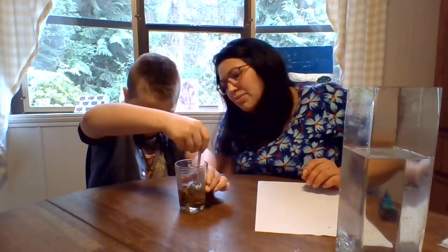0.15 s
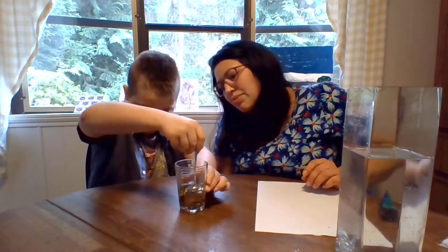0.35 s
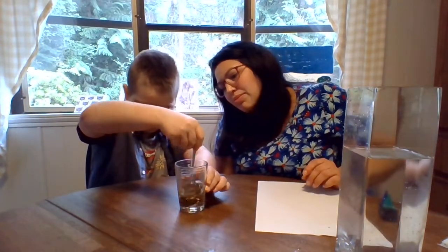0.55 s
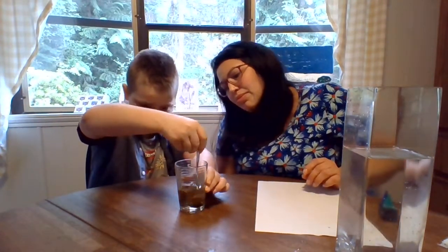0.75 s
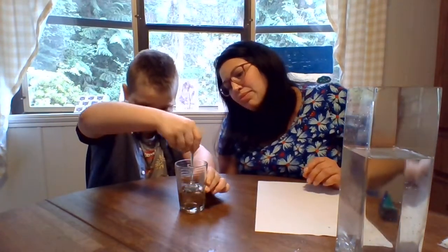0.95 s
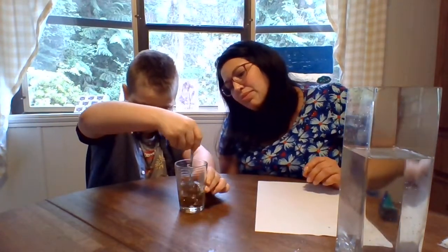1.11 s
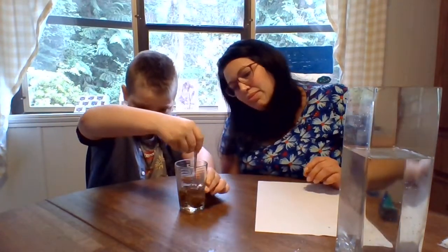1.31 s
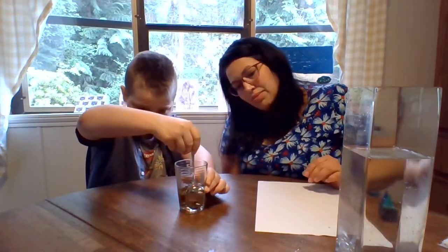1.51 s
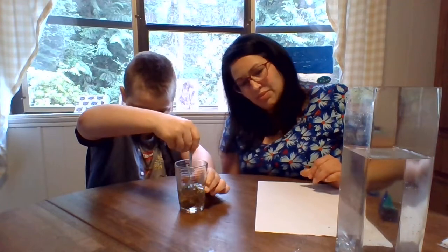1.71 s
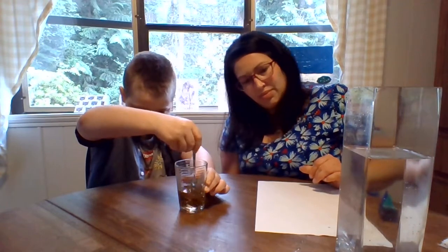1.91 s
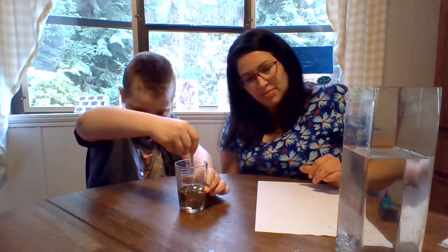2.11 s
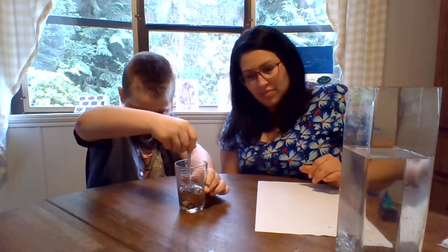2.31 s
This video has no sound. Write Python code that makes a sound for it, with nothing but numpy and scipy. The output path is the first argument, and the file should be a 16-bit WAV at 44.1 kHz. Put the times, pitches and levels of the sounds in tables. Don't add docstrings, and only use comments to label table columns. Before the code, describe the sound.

A metal spoon stirs a small glass on a wooden table; four sharp ringing clinks come unevenly, with dull thumps and rattles of the glass foot, in a small room through a hissy laptop microphone.

```python
import sys
import numpy as np
from scipy import signal
from scipy.fft import rfft, irfft
from scipy.io import wavfile

SR = 44100
rng = np.random.default_rng(int(sys.argv[2]) if len(sys.argv) > 2 else 0)


def nominal_scale(level):
    x = np.asarray(level, float) / 20
    return 10 ** x


def put_to_file(sound):
    columns = np.atleast_2d(sound).T
    safe = np.clip(columns, -1, 1)
    whole_steps = np.round(safe * 32767)
    wavfile.write(sys.argv[1], SR, whole_steps.astype(np.int16))


N = 103635
TIME_S = np.arange(N) / SR

# f/Hz, level/dB
WHINE_TONES = [(1001, -76), (1529, -79), (2003, -77), (4011, -78), (5012, -77), (5809, -85), (6013, -83),
               (7014, -90), (8000, -83), (8667, -83), (8699, -75), (10024, -82), (11025, -76), (11590, -92)]
# f/Hz, density/dB per Hz
HISS_COLOUR = [(880, -21), (1500, 5.5), (2470, 1.5), (2700, -9.5), (3880, -1.5), (4370, -4), (4940, -6),
               (8880, -2), (11800, 2.5), (15300, -73), (22000, -120)]
# f/Hz, density/dB per Hz
AIR_COLOUR = [(60, -36), (90, 14), (130, -10.5), (400, 6), (800, -8), (1200, -12), (1700, -10),
              (2300, -54.5)]
# t/s, length/s, loss/dB
TREBLE_DROPS = [(.445, .018, -12), (1.30, .018, -14), (1.47, .018, -10), (1.60, .018, -10),
                (1.958, .015, -22)]
# t/s, level/dB
DRAG_PRESSURE = [(0, -47), (.15, -50.5), (.3, -28.5), (0.442, -50.5), (0.498, -32), (0.568, -71),
                 (.7, -39.5), (1.0, -44.5), (1.07, -43), (1.135, -54.5), (1.2, -46), (1.33, -37.5),
                 (1.48, -49), (1.56, -42.5), (1.85, -43), (1.97, -41), (2.22, -39.5), (2.35, -64)]
# f/Hz, density/dB per Hz
RUMBLE_COLOUR = [(50, -44.5), (100, -5), (140, 1), (300, -6), (400, -28.5), (550, -48), (900, -22),
                 (1500, -36)]
# start t/s, length/s, level/dB, f/Hz
TIP_RUBS = [(-0.01, 0.22, -49, 826), (0.643, 0.068, -44.5, 890), (1.124, 0.14, -46, 844),
            (1.4, 0.24, -53, 775), (1.83, 0.089, -55.5, 820), (1.905, 0.1, -43, 845),
            (2.108, 0.24, -52, 780)]
# start t/s, length/s, level/dB, f/Hz
SINGING_NOTES = [
    (1.932, 0.057, -29.5, 840),
    (1.975, 0.042, -32.5, 827),
]
# t/s, level/dB, rattle length/s, contact hardness f/Hz
FOOT_THUMPS = [(0.0, -33, 0.019, 600), (0.12, -35, 0.022, 1500), (0.202, -21, 0.1, 1230),
               (0.2663, -10, 0.017, 1170), (0.61, -15, 0.025, 740), (.67, -52, 0.018, 1500),
               (.775, -24, 0.048, 1510), (0.807, -29, 0.017, 600), (0.844, -8.5, 0.021, 1150),
               (1.343, -29.5, 0.034, 1480), (1.362, -16, 0.032, 1000), (1.859, -37, 0.032, 810),
               (2.017, -18, 0.025, 810), (2.045, -14, 0.014, 1000), (2.189, -39, 0.025, 810)]
# f/Hz, level/dB, t60/s
TABLE_MODES = [(146, -7, 0.05), (172, -5, 0.068), (245.6, -1.5, 0.093), (301.2, -1, 0.095),
               (369, -0.5, 0.069), (415.6, 0.5, 0.064), (529.6, -6, 0.08), (600, -8, 0.052),
               (835, -3, 0.033), (1000, -4.5, 0.02), (1286, -5.5, 0.023), (1610, -9, 0.032),
               (1820, -9, 0.026)]
# t/s, level/dB, f/Hz
SPOON_TOUCHES = [(0.218, -37, 4210), (0.23, -35.5, 3910), (.2665, -27.5, 3460), (0.608, -51, 3780),
                 (0.8446, -32.5, 3430), (1.377, -35.5, 3280), (2.045, -34, 3780)]
# t/s, crack level/dB, low mode
# level/dB, middle mode level/dB, high mode level/dB
SPOON_CLINKS = [(0.0, -38.5, -61, -83, -63), (0.1986, -14, -29.5, -28.5, -25.5),
                (0.268, -70, -41, -73, -55), (.609, -42.5, -64, -89, -58), (.7736, -12.5, -33, -39.5, -24),
                (0.851, -72, -41, -41.5, -40.5), (1.207, -60, -68, -83, -67),
                (1.3416, -15, -39.5, -39, -24), (1.41, -70, -38.5, -68, -41),
                (2.0094, -12, -35.5, -31.5, -25.5), (2.06, -70, -38.5, -70, -56)]
# f/Hz, density/dB per Hz
CRACK_COLOUR = [(300, -3.5), (1000, 2.5), (2000, -2), (4000, -5), (6000, -5), (9000, -2), (11000, -6),
                (13000, 6.5)]
# f/Hz, level/dB, t60/s
LOW_GLASS = [(2751, 0, .15), (2722, -4, .1), (2803, -6, .08), (2570, -4, .06), (3800, -12, .04),
             (2400, -8, .04)]
MIDDLE_GLASS = [(6342, 0, .21), (5500, -5, .08), (6040, -11, .07)]
HIGH_GLASS = [(8168, -4, .2), (8207, 0, .22), (8236, -4, .17), (8291, -6, .1), (8200, 7, .025),
              (11400, -11, .05), (4850, 3, .02)]
GLASS_SWELL_S = (.04, .006, .005)


def rms_one(x):
    return x / np.sqrt(np.mean(x ** 2) + 1e-20)


def shaped(x, points):
    hz = np.fft.rfftfreq(len(x), 1 / SR) + 1
    f, db = np.transpose(points)
    octaves_out = np.maximum(np.log2(f[0] / hz), 0) + np.maximum(np.log2(hz / f[-1]), 0)
    gain_db = np.interp(np.log(hz), np.log(f), db) - 22 * octaves_out
    return rms_one(irfft(rfft(x) * nominal_scale(gain_db), len(x)))


def drift(rate_hz):
    r = np.exp(-2 * np.pi * rate_hz / SR)
    wander = signal.lfilter([1], [1, -2 * r, r * r], rng.standard_normal(N + SR))
    return rms_one(wander[SR:])


def ring(clicks, hz, t60):
    r, w = nominal_scale(-60 / (t60 * SR)), 2 * np.pi * hz / SR
    return signal.lfilter([0, np.sin(w)], [1, -2 * r * np.cos(w), r * r], clicks + 1e-18)


def hump(start, length):
    return np.sin(np.pi * np.clip((TIME_S - start) / length, 0, 1)) ** 2


def clicks_at(times, levels_db):
    clicks = np.zeros(N)
    clicks[(np.asarray(times) * SR).astype(int)] = nominal_scale(levels_db)
    return clicks


def butter(order, hz, kind="low"):
    return signal.butter(order, hz, kind, fs=SR, output="sos")


def whine():
    out = np.zeros(N)
    for hz, db in WHINE_TONES:
        out += np.sqrt(2) * nominal_scale(db + 1.5) * np.sin(2 * np.pi * (hz * TIME_S + rng.random()))
    return out


def hiss():
    return nominal_scale(-64.5 + 0.4 * drift(3.2)) * shaped(rng.standard_normal(N), HISS_COLOUR)


def air():
    return nominal_scale(-57.5 + 0.61 * drift(1)) * shaped(rng.standard_normal(N), AIR_COLOUR)


def rumble():
    t, db = np.transpose(DRAG_PRESSURE)
    lumpy = rng.standard_normal(N) * nominal_scale(2.5 * drift(14))
    return nominal_scale(np.interp(TIME_S, t, db) - 2.5) * shaped(lumpy, RUMBLE_COLOUR)


def rubs():
    width_hz, wide_db = 65, -12
    out, noise = np.zeros(N), rng.standard_normal(N)

    def resonance(hz, width):
        t60 = 0.92 / width
        return rms_one(ring(ring(noise, hz, t60), hz, t60))

    for start, length, db, hz in TIP_RUBS:
        swell = hump(start, length)
        narrow, wide = resonance(hz, width_hz), resonance(hz, 8 * width_hz)
        narrow = narrow / np.sqrt(np.sum(swell * narrow ** 2) / np.sum(swell))
        out += nominal_scale(db) * swell * (narrow + nominal_scale(wide_db) * wide)
    return out


def sings():
    out = np.zeros(N)
    for start, length, db, hz in SINGING_NOTES:
        out += nominal_scale(db) * hump(start, length) * np.sin(2 * np.pi * hz * TIME_S)
    return out


def thumps():
    contacts_per_s, contact_db, thump_db = 790, -6, -9.5
    force = np.zeros(N)
    rattle = (rng.random(N) < contacts_per_s / SR) * rng.normal(0, nominal_scale(contact_db), N)
    for t, db, length, hardness_hz in FOOT_THUMPS:
        fade = np.exp(-(np.maximum(TIME_S - t, 0) / max(length, .003)) ** 2)
        blow = rattle * (TIME_S > t) * fade
        blow[int(t * SR)] += 1
        force += nominal_scale(db) * signal.sosfilt(butter(2, hardness_hz), blow + 1e-18)
    out = np.zeros(N)
    for k, (hz, db, t60) in enumerate(TABLE_MODES):
        out += nominal_scale(db) * (-1) ** k * ring(force, hz, t60)
    return nominal_scale(thump_db) * out


def touches():
    ping_t60_s, tick_t60_s, tick_db = .025, .002, -4
    out = np.zeros(N)
    for t, db, hz in SPOON_TOUCHES:
        click = clicks_at([t], db)
        out += ring(click, hz, ping_t60_s)
        out += nominal_scale(tick_db) * ring(click, 1.5 * hz, tick_t60_s)
    return out


def cracks():
    trim_db, t60_s = -1, 0.009
    level = np.zeros(N)
    for t, db, *_ in SPOON_CLINKS:
        level += (TIME_S >= t) * nominal_scale(db + trim_db - 60 * np.maximum(TIME_S - t, 0) / t60_s)
    return level * shaped(rng.standard_normal(N), CRACK_COLOUR)


def crack_for_room(crack):
    rows = np.array(SPOON_CLINKS)
    clicks = clicks_at(rows[:, 0], rows[:, 1])
    return shaped(clicks, CRACK_COLOUR) * np.sqrt(np.mean(crack ** 2))


def glass_ring():
    strike_spread_db = 2.5
    out, rows = np.zeros(N), np.array(SPOON_CLINKS)
    families = [(LOW_GLASS, 3.5), (MIDDLE_GLASS, -3), (HIGH_GLASS, -7.5)]  # modes, level/dB
    for k, (modes, family_db) in enumerate(families):
        swell_s = GLASS_SWELL_S[k]
        swell_gain = 2 * np.log(1000) / (swell_s * SR)
        spread_db = rng.normal(0, strike_spread_db, (len(rows), len(modes)))
        for (hz, db, t60), own_db in zip(modes, spread_db.T):
            clicks = clicks_at(rows[:, 0], rows[:, 2 + k] + family_db + db + own_db)
            out += ring(ring(clicks, hz, t60), hz, swell_s) * swell_gain
    return out


def room(x):
    split_hz, rise_s = 600, 0.007
    t = np.arange(SR) / SR
    noise = rng.standard_normal((2, SR)) * (1 - np.exp(-t / rise_s))
    answer = np.zeros(SR)
    for v, kind, db, t60_s in zip(noise, ("low", "high"), (-7.5, -6), (0.19, 0.37)):
        answer += nominal_scale(db) * signal.sosfilt(butter(2, split_hz, kind), v) * nominal_scale(-60 * t / t60_s)
    return signal.fftconvolve(x, answer / np.sqrt(SR * 0.014))[:N]


def dropouts(x):
    high = signal.sosfiltfilt(butter(3, 1960, "high"), x)
    loss_db = sum(db * hump(t - length, 2 * length) for t, length, db in TREBLE_DROPS)
    return x - high * (1 - nominal_scale(loss_db))


def scene():
    tones, crack = glass_ring(), cracks()
    knocks = thumps() + touches()
    background = hiss() + air()
    ring_send_db, crack_send_db = 5, 4.5
    wet = room(nominal_scale(ring_send_db) * tones + nominal_scale(crack_send_db) * crack_for_room(crack) + knocks)
    noisy = dropouts(wet + background + rubs())
    mix = tones + crack + knocks + noisy + sings() + rumble() + whine()
    return mix[None]


def band_limit(x):
    return signal.sosfilt(signal.butter(12, 12860, fs=SR, output="sos"), x)


def record(dry):
    smear_s, smear_db, top = .022, -17, .5
    ahead = int(smear_s * SR)
    spread = rng.standard_normal(ahead) * np.linspace(0, 1, ahead) / np.sqrt(ahead)
    x = dry + nominal_scale(smear_db) * signal.fftconvolve(dry, spread[None])[:, ahead - 1:]
    x = signal.sosfilt(butter(2, 60, "high"), x)
    x = top * np.tanh(x / top)
    x = signal.sosfilt(signal.cheby2(14, 36, 11900, fs=SR, output="sos"), x)
    return band_limit(x)


dry = scene()
out = record(dry)
put_to_file(out)
```